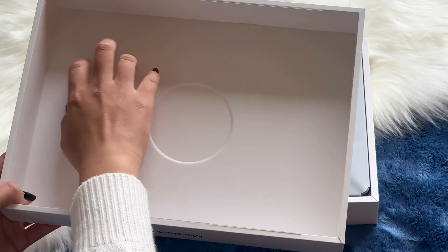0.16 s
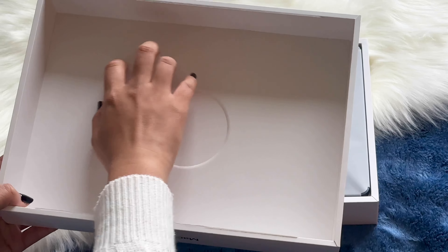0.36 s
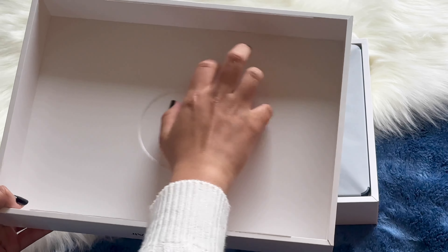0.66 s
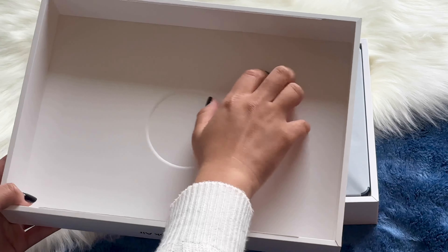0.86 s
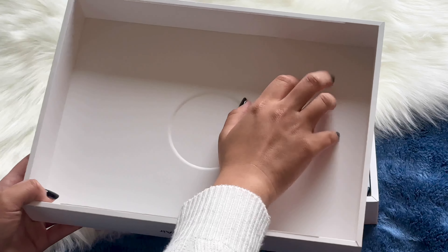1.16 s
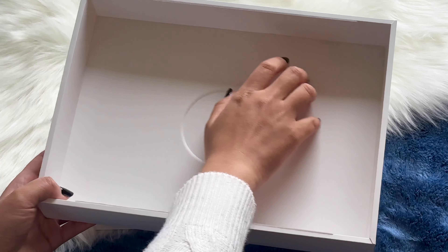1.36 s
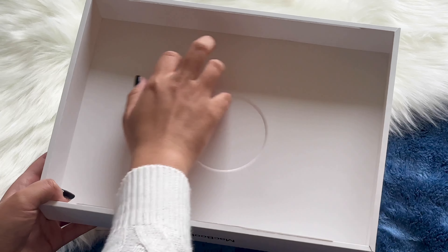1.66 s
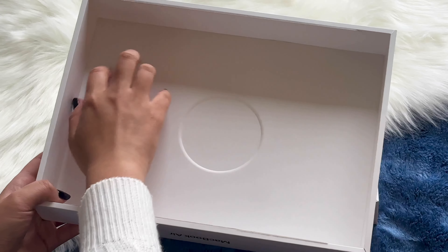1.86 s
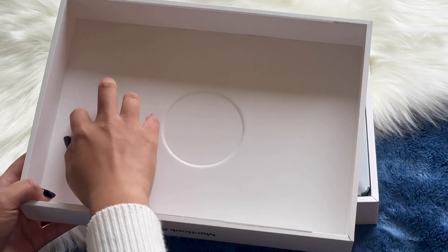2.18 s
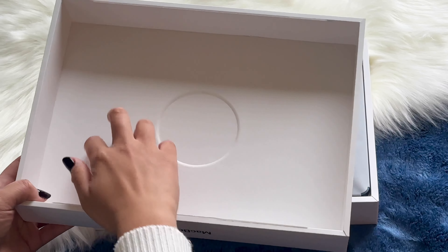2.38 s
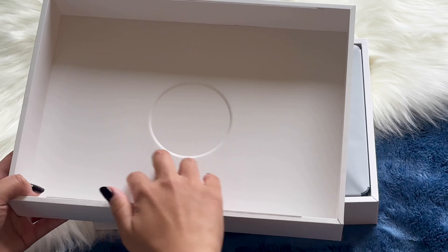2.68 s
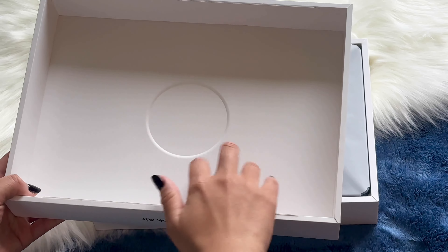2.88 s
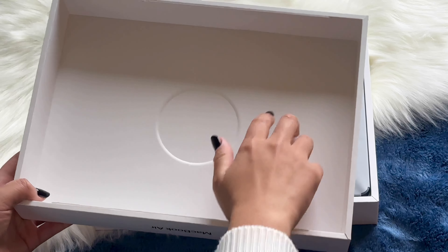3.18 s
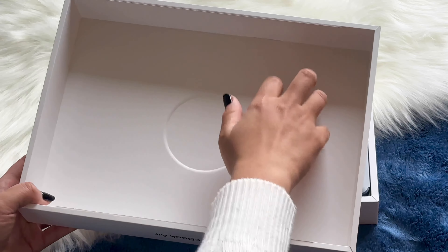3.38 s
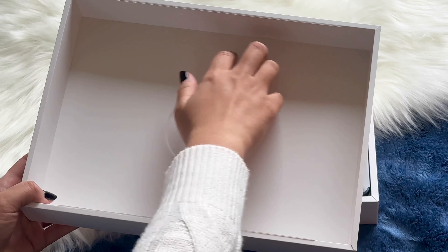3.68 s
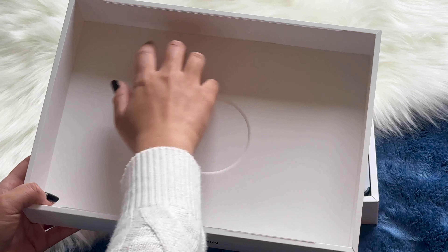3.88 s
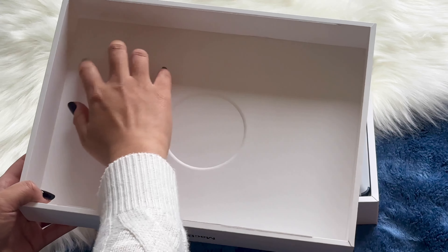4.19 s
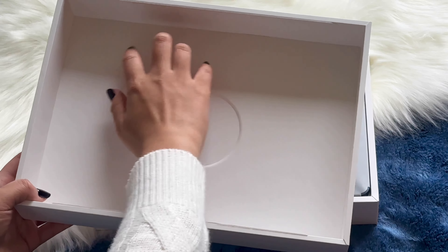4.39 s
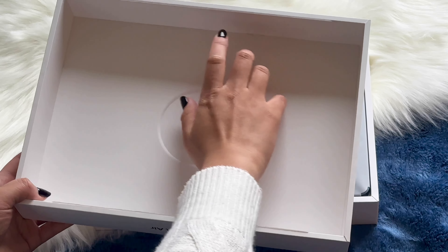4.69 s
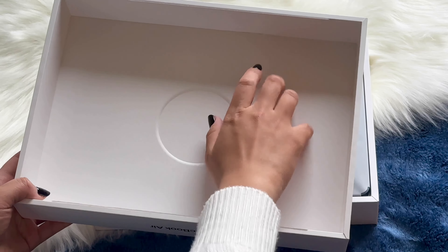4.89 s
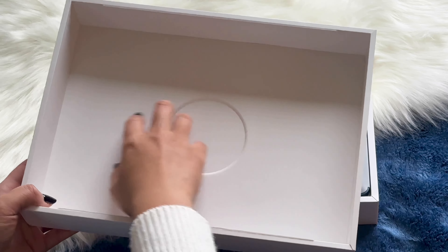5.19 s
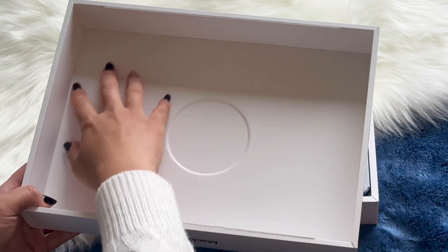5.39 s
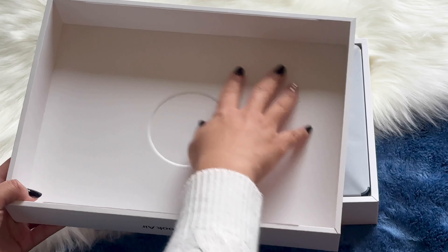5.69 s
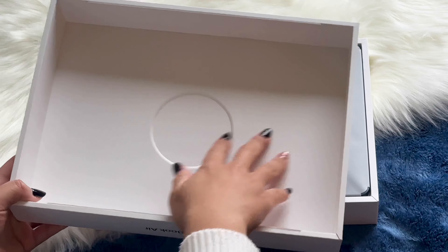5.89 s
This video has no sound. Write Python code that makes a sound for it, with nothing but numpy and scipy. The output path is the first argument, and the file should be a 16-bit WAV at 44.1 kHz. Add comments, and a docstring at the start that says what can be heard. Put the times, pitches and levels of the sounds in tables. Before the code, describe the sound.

Long fingernails tap and scratch rapidly inside a hollow stiff cardboard lid, very close, ending with flat fingers sweeping softly across the card.

```python
"""In a small, well-damped room, long fingernails tap and scratch inside a stiff cardboard lid, very close.
Each tap superposes a tick, a clack and decaying modes of panel, wall and lid on a low drum note.
Each drag is a train of random slips over the paper grain, filtered by the card, until the nail lifts off.
At the end flat fingers sweep the lid: much denser slips hiss softly, and finger pads bump it almost tickless.
A cuff rustles throughout, and the air space of the lid hums on after each excitation."""
import sys
import numpy as np
from scipy import signal
from scipy.fft import rfft, irfft
from scipy.io import wavfile
from scipy.ndimage import uniform_filter1d, minimum_filter1d

SR = 44100
rng = np.random.default_rng(int(sys.argv[2]) if len(sys.argv) > 2 else 0)


def generate_wav(signal):
    """Clip the signal to [-1, 1] and save it as 16-bit WAV at the path in sys.argv[1]."""
    frames = np.transpose(np.atleast_2d(signal))
    scaled = np.clip(frames, -1, 1) * 32767
    pcm = np.round(scaled).astype(np.int16)
    wavfile.write(sys.argv[1], SR, pcm)


N = 266784
TIME = np.arange(N) / SR


def undb(db):
    """Level to amplitude: 20 dB per factor of ten."""
    return 10 ** (np.asarray(db) / 20)


def unit(x):
    """Energy normalisation: scale to a mean energy of one per channel."""
    return x / np.sqrt(np.sum(x ** 2) / len(np.atleast_2d(x)) + 1e-18)


def fade(t, t60):
    """Exponential damping: 60 dB down after t60."""
    return np.exp(-np.log(1000) * t / t60)


def along(curve, t):
    """Linear interpolation: value of a curve at a time."""
    return np.interp(t, *np.transpose(curve))


def add(out, start, x):
    """Superposition: mix x into out from a start time."""
    i = max(int(start * SR), 0)
    out[:, i:i + x.shape[1]] += x[:, :N - i]


def through(x, response):
    """Convolution: pass a sound through the impulse response of a linear system."""
    filtered = signal.fftconvolve(np.atleast_2d(x), np.atleast_2d(response), axes=1)
    return filtered[:, :x.shape[-1]]


def highpass(x, hz, order):
    """Butterworth high-pass: attenuate what lies below a frequency."""
    return signal.sosfilt(signal.butter(order, hz, "high", fs=SR, output="sos"), x)


def lowpass(x, hz, order):
    """Butterworth low-pass: attenuate what lies above a frequency."""
    return signal.sosfilt(signal.butter(order, hz, "low", fs=SR, output="sos"), x)


def resonance(x, hz, q):
    """Simple resonator: band-pass with gain one at its centre."""
    return signal.lfilter(*signal.iirpeak(hz, q, fs=SR), x)


def colour(points, scale=1, size=4096):
    """Minimum phase: the folded cepstrum gives a causal response with the given spectrum."""
    hz, db = np.transpose(points)
    f = np.maximum(np.fft.rfftfreq(size, 1 / SR), 1)
    gain_db = np.interp(np.log(f), np.log(hz * scale), db)
    cepstrum = irfft(np.log(undb(gain_db)))
    cepstrum[1:size // 2] *= 2
    cepstrum[size // 2 + 1:] = 0
    return unit(irfft(np.exp(rfft(cepstrum)))[:size // 2])


def stereo_noise(count, apart):
    """Partial coherence: noise in two channels with a shared and an opposed part."""
    mid, side = rng.standard_normal((2, count))
    return (mid + apart * np.array([side, -side])) / np.hypot(1, apart)


def scatter(t60, tail_db, apart):
    """Diffuse reflection: a direct pulse, then a dense decaying pattern that is new on each call."""
    t = np.arange(int(t60 * SR) + 2) / SR
    response = undb(tail_db) * unit(stereo_noise(len(t), apart) * fade(t, t60))
    response[:, 0] += 1
    return unit(response)


def grains(count, per_s, spread_db):
    """Stick-slip friction: tiny slips over paper fibres, random in time, sign and size."""
    slips = (rng.random(count) < per_s / SR) * rng.choice([-1, 1], count)
    size_db = spread_db * np.clip(rng.standard_normal(count), -2, 2)
    return unit(slips * undb(size_db)) * np.sqrt(count)


def walk(count, rate):
    """Random fluctuation: normal values, rate per second, joined by straight lines."""
    steps = np.arange(count) / SR * rate
    knots = np.arange(int(steps[-1]) + 2)
    return np.interp(steps, knots, rng.standard_normal(len(knots)))


# the hand wanders to and fro across the lid: (t/s, place from about -1 at the left wall to 1 at the right)
HAND = [(0, -0.94), (.5, -0.017), (1, 1), (1.35, 0.63), (1.75, 0.023), (2.05, -0.77), (2.75, -0.55),
        (3.3, 0.95), (3.55, 1), (4.15, -1.06), (4.5, 0.049), (4.95, 0.78), (5.3, -0.6), (5.8, 0.58),
        (6.05, -0.052)]


def place(t):
    """Source motion: where the hand is across the lid."""
    return along(HAND, t)


def pan(db):
    """Level difference between channels: left and right gains of constant mean energy."""
    gains = undb(np.array([[.5], [-.5]]) * db)
    return gains / np.sqrt(np.mean(gains ** 2, axis=0))


# left minus right: added with the hand at the left wall; default at the centre; for card and drum at the centre
PAN_DB, LEFT_DB, CARD_LEFT_DB, DRUM_LEFT_DB = 5, 1.8, -0.64, 2.5


def from_hand(t, follow=1, left_db=LEFT_DB):
    """Localisation by level: gains of a sound that follows the hand more or less closely."""
    return pan(left_db - follow * PAN_DB * place(t))


# spectrum of the rustling cuff: (f/Hz, level/dB)
SLEEVE_SPECTRUM = [(30, -18), (70, -10), (145, -7), (250, 1.5), (700, -3), (1500, -10), (3000, -17),
                   (5000, -22.5), (8000, -27.5), (12000, -49), (15000, -71)]


def sleeve(level_db=-53, swell_db=2):
    """Broadband friction noise: the knitted cuff and the holding hand rustle faintly all the time."""
    level = undb(level_db + swell_db * walk(N, rate=4.9))
    return level * through(stereo_noise(N, apart=0.76), colour(SLEEVE_SPECTRUM))


# panel modes above the drum note, before chance: (f/Hz, t60/s, level/dB)
PANEL_MODES = [(202, 0.081, 0), (234, 0.052, 2.5), (291.6, 0.032, 9.5), (309, 0.091, -13), (331, 0.1, 3),
               (429, 0.028, 8.5), (460, 0.059, -3), (500, 0.057, 2), (560, 0.037, -9.5), (626, 0.069, -1.5),
               (646, 0.094, -6), (760, 0.044, -22)]


def panel(t, knock_hz, reach=0.39, far_db=-13, lag=0.75):
    """Modal superposition: the struck spot favours panel modes around one frequency."""
    hz, t60, db = np.transpose(PANEL_MODES)[:, :, None]
    octaves = np.log2(hz / knock_hz)
    favour_db = far_db * (1 - np.exp(-(octaves / reach) ** 2))
    hz = hz * (1 + 0.018 * rng.standard_normal(hz.shape))  # the grip bends the lid a little
    gain_chance, phase_chance = rng.standard_normal((2, 2, len(PANEL_MODES), 1))
    size = undb(db + favour_db + 3 * gain_chance)
    rings = size * fade(t, t60) * np.sin(2 * np.pi * hz * t + lag * phase_chance)
    return unit(rings.sum(axis=1))


# modes of the stiff front wall: (f/Hz, t60/s, level/dB)
WALL_MODES = [(360, 0.14, -1), (550.5, 0.092, 2.5), (639, 0.12, 3)]
# how strongly the hand rings that wall, most when it is drawn back to it: (t/s, level/dB)
WALL_RING = [(0, -11.5), (2.4, -15.5), (2.55, 3.5), (2.75, 0.5), (2.9, 0), (3.12, 5.5), (3.2, -16.5),
             (6.05, -7.5)]


def wall(t, when):
    """Modal coupling: front wall modes, excited as strongly as the hand's moment allows."""
    hz, t60, db = np.transpose(WALL_MODES)[:, :, None]
    phase = .5 * rng.standard_normal((2, len(WALL_MODES), 1))  # its own in each channel
    rings = undb(db) * fade(t, t60) * np.sin(2 * np.pi * hz * t + phase)
    return undb(along(WALL_RING, when)) * unit(rings.sum(axis=1))


# mean drum note at the centre of the lid, how much lower it is at a wall, and its spread with the grip
DRUM_HZ, DRUM_SAG_HZ, DRUM_SPREAD_HZ = 160.5, 10.6, 5.2


def drum_note(t, start, lag, t60=0.078):
    """Fundamental mode: a damped sine whose pitch depends on place and grip."""
    hz = DRUM_HZ - DRUM_SAG_HZ * place(start) ** 2 + DRUM_SPREAD_HZ * rng.standard_normal()
    envelope = fade(t, t60) * (1 - fade(t, 0.067))
    return pan(DRUM_LEFT_DB) * unit(np.sin(2 * np.pi * hz * t + lag) * envelope)


def lid_sway(t, start, lag, hz=74, t60=0.079, level_db=-44, wall_db=39, right_db=-8):
    """Rigid-body motion: blows near a wall rock the whole lid, most on the hand-held left side."""
    envelope = fade(t, t60) * (1 - fade(t, 0.15))
    level = level_db + wall_db * place(start) ** 2 + right_db * max(place(start), 0)
    return undb(level) * unit(np.sin(2 * np.pi * hz * t + lag) * envelope)


# spectrum of the card's clack, before its pitch shift: (f/Hz, level/dB)
CLACK_SPECTRUM = [(60, -51), (200, -36.5), (550, 0.5), (850, 6), (1300, 2), (1800, 1), (2400, -17.5),
                  (3200, -14.5), (7000, -43.5), (14000, -102)]


def card_clack(t, variety=0.072, dent_db=-3, dent_s=.0012):
    """Impact response: a coloured, scattered pulse and the dent of the card snapping inward."""
    pitch = np.exp(variety * rng.uniform(-1.6, 1))  # each spot of the card has its own stiffness
    pulse = through(1. * (t == 0), colour(CLACK_SPECTRUM, pitch))
    card = unit(through(pulse, scatter(t60=0.02, tail_db=9.0, apart=0.57)))
    ramp = np.maximum(1 - t / dent_s, 0)
    dent = unit(lowpass(highpass(ramp, hz=300, order=3), hz=1680, order=3))
    return card + undb(dent_db) * dent


# spectrum of the tick, before its pitch shift: (f/Hz, level/dB)
TICK_SPECTRUM = [(500, 2.5), (1800, 1), (2900, -3.5), (3800, 0.5), (4600, 3.5), (5300, -0.5), (6300, -4.5),
                 (7500, -20), (10000, -31), (12000, -54), (16000, -66)]
# hiss and tick shift as the fingers change their angle: (t/s, centre f/Hz)
HISS_CENTRE = [(0, 4460), (.45, 4200), (.7, 4930), (1.1, 5000), (1.33, 4850), (1.52, 5240), (1.58, 4440),
               (1.68, 4650), (1.76, 4320), (1.9, 4850), (2.2, 4760), (2.35, 5460), (2.46, 4460),
               (2.6, 4700), (2.64, 4080), (3.05, 3940), (3.3, 4720), (3.55, 5240), (3.68, 4250),
               (3.79, 4860), (3.89, 4450), (3.95, 5100), (4.03, 4670), (4.6, 4700), (4.97, 4870),
               (5.13, 4200)]


def tip_tick(t, start, centre_hz=4600):
    """Hard contact: a short bright pulse, shifted in pitch by the angle of the finger."""
    pulse = through(1. * (t == 0), colour(TICK_SPECTRUM, along(HISS_CENTRE, start) / centre_hz))
    return unit(through(pulse, scatter(t60=0.011, tail_db=-3.5, apart=0.78)))


# the clack lies between knock and tick, louder on stiff, high spots
CLACK_DB, CLACK_TICK_SHARE, CLACK_DB_PER_OCTAVE = -6.5, 0.7, 3
# nail taps, and at the end soft bumps of the finger pads, with almost no tick; levels before offsets:
# (t/s, knock level/dB, knock f/Hz, drum level/dB, tick level/dB)
TAPS = [(0.0092, -13.5, 210, -26.5, -27.5), (0.1006, -17.5, 510, -49, -25.5), (0.195, -14, 188, -18, -30),
        (0.2367, -12.5, 198, -20, -25), (0.298, -13.5, 220, -33, -29), (0.4213, -13.5, 202, -20.5, -25),
        (0.4605, -13.5, 200, -25, -34), (0.5308, -13.5, 277, -24, -32), (0.67, -14, 234, -23.5, -28.5),
        (0.748, -13.5, 234, -24.5, -30.5), (0.791, -16.5, 220, -27, -31.5), (0.883, -16.5, 326, -25, -31.5),
        (1.025, -17, 240, -38, -29.5), (1.0946, -18, 191, -28, -31), (1.1529, -21.5, 212, -27.5, -41.5),
        (1.259, -20.5, 710, -43, -30.5), (1.2986, -15, 234, -26.5, -29), (1.3844, -14, 228, -20.5, -30),
        (1.543, -11, 680, -40, -28), (1.7489, -11, 322, -13, -22), (1.7878, -12.5, 234, -21, -24),
        (1.8687, -17, 514, -43, -23.5), (2.0191, -15, 184, -16, -34.5), (2.0348, -14, 455, -31, -20),
        (2.2595, -24, 195, -29.5, -47), (2.2814, -22.5, 726, -35, -34.5), (2.4659, -16, 190, -14.5, -29.5),
        (2.4825, -17, 330, -19, -32.5), (2.5243, -20, 211, -30, -29.5), (2.7095, -22.5, 344, -21.5, -30),
        (2.751, -19, 360, -36, -21.5), (2.9067, -18.5, 225, -29, -27.5), (2.947, -14, 219, -17, -27),
        (3.0388, -17.5, 540, -19, -34.5), (3.0853, -20.5, 610, -48, -34), (3.1219, -17.5, 210, -19, -28.5),
        (3.2264, -13, 218, -15.5, -32.5), (3.303, -17.5, 202, -19, -32.5), (3.311, -21, 330, -19, -39),
        (3.3319, -17, 316, -42, -42), (3.429, -15, 483, -29, -27), (3.445, -15, 231, -45, -32.5),
        (3.5474, -13, 236, -29, -27.5), (3.6796, -15, 705, -23.5, -30.5), (3.8566, -12.5, 700, -45, -24),
        (3.943, -13, 446, -37, -20), (4.0245, -11.5, 220, -24, -30), (4.033, -15.5, 263, -28, -26),
        (4.108, -21.5, 209, -35, -34.5), (4.1932, -20.5, 480, -21, -29.5), (4.2564, -19.5, 200, -38, -37.5),
        (4.266, -19, 200, -34, -36), (4.282, -27, 420, -38, -35), (4.4664, -13.5, 392, -19.5, -28),
        (4.5282, -13.5, 333, -24, -23), (4.6372, -11, 235, -16.5, -28.5), (4.6489, -24, 324, -31, -29.5),
        (4.812, -12.5, 318, -24, -29), (4.853, -22.5, 300, -34, -50), (4.926, -14.5, 236, -24.5, -29.5),
        (5.0402, -11, 283, -26, -32), (5.162, -11.5, 283, -21, -31), (5.199, -8.5, 196, -17, -29),
        (5.2442, -21.5, 342, -30, -37), (5.649, -22, 190, -21.5, -54), (5.741, -30.5, 230, -42, -54),
        (5.828, -31, 200, -31, -54), (5.932, -39, 200, -40, -54), (5.975, -30.5, 220, -29, -56)]


def taps(drum_db=0, knock_db=0, tick_db=-0.5, radiate_hz=118, push_s=0.0011, wall_db=-1):
    """Impulsive excitation: a landing nail or soft finger pad excites tick, clack, panel, drum, lid, wall."""
    out, t = np.zeros((2, N)), np.arange(SR // 4) / SR
    push = np.sin(np.pi / 2 * np.minimum(t / push_s, 1)) ** 2  # the fingertip loads the panel gently
    blow = np.sqrt(SR / 100)  # levels are energies spread over 10 ms
    for start, knock, knock_hz, drum, tick in TAPS:
        lag = 0.65 * rng.standard_normal((2, 1))
        height_db = CLACK_DB_PER_OCTAVE * np.log2(knock_hz / PANEL_MODES[0][0])
        clack = CLACK_DB + knock + CLACK_TICK_SHARE * (tick - knock) + height_db
        on_card = from_hand(start, follow=0.36, left_db=CARD_LEFT_DB)
        low = undb(drum + drum_db) * drum_note(t, start, lag)
        upper = undb(knock + knock_db) * on_card * panel(t, knock_hz)
        # air slips round the open lid, so it radiates little below its drum note
        body = highpass(push * (low + upper), radiate_hz, order=6)
        body = body + undb(drum) * lid_sway(t, start, lag)
        body = body + undb(clack + wall_db) * wall(t, start)
        contact = undb(clack) * on_card * card_clack(t)
        contact = contact + undb(tick + tick_db) * from_hand(start, follow=0.96) * tip_tick(t, start)
        # the panel first gives way, so the sound opens with a dip in pressure
        add(out, start, blow * (body - contact))
    return out


# a dragged spot gives little outside these multiples of its hollow resonance
BASS_CUT_SHARE, TREBLE_CUT_RATIO = 0.3, 2.77
# spectrum of the grinding card: (f/Hz, level/dB)
GRIND_SPECTRUM = [(50, -33), (105, -27), (145, 9.5), (200, -5), (330, 6.5), (430, -3), (660, -0.5),
                  (950, -1.5), (1400, -3.5), (1900, -11), (2700, -33.5), (3600, -17), (7000, -94),
                  (14000, -92)]


def card_grind(slips, hollow_hz, middle, hollow_db=-3, ring_db=-9, wall_db=-3):
    """Source-filter principle: slips excite the spot under the nail, the panel and the wall."""
    card = through(scatter(t60=0.017, tail_db=1.0, apart=0.62), colour(GRIND_SPECTRUM))
    card = highpass(card, BASS_CUT_SHARE * hollow_hz, order=1)
    card = lowpass(card, TREBLE_CUT_RATIO * hollow_hz, order=2)
    card = unit(card + undb(hollow_db) * resonance(card, hollow_hz, q=3.4))  # the spot rings most
    ring_s = np.arange(card.shape[1]) / SR
    modes = highpass(panel(ring_s, hollow_hz) * (1 - fade(ring_s, 0.0031)), hz=330, order=2)
    card = unit(card + undb(ring_db) * modes)  # the slips keep the panel modes ringing too
    t = np.arange(len(slips)) / SR
    return through(slips, card) + undb(wall_db) * through(slips, wall(t, middle))


# hiss of a sliding nail: (multiple of the hiss centre f/Hz, level/dB)
HISS_SPECTRUM = [(.25, -24), (.42, -3), (.6, -8), (.72, -6), (.86, -4), (1, 3), (1.12, -1), (1.3, -6.5),
                 (1.55, -14), (2.1, -33), (3, -79)]


def tip_hiss(slips, progress, start, end, catch_db=1.95):
    """Moving formant: the tip turns as it slides, so its hiss glides; it catches and eases."""
    middle = (start + end) / 2
    echoes = scatter(t60=.02, tail_db=-4, apart=.45)
    early_hz = along(HISS_CENTRE, (start + middle) / 2)
    late_hz = along(HISS_CENTRE, (middle + end) / 2)
    early = unit(through(echoes, colour(HISS_SPECTRUM, early_hz)))
    late = unit(through(echoes, colour(HISS_SPECTRUM, late_hz)))
    scrape = slips * undb(catch_db * walk(len(slips), rate=39.4))
    return through(scrape * (1 - progress), early) + through(scrape * progress, late)


# spectrum of the finest fibres, under nails and flat fingers: (f/Hz, level/dB)
FIZZ_SPECTRUM = [(4000, -30), (6500, 1), (8000, 2), (10000, -1), (11500, -10.5), (13500, -22), (15500, -36)]


def fibre_fizz(slips):
    """High-frequency scattering: the slips excite the finest fibres."""
    fibres = through(scatter(t60=0.017, tail_db=18.0, apart=1), colour(FIZZ_SPECTRUM))
    return through(slips, unit(fibres))


def edge_rasp(force, centre_hz=2150, level_db=-12, hard_db=-24):
    """Non-linear friction: pressed hard, the nail edge digs in and rasps with sparse, uneven slips."""
    bite = np.minimum(force / undb(hard_db), 1)
    edge = scatter(t60=0.018, tail_db=-1.5, apart=0.55)
    for _ in range(3):
        edge = resonance(edge, centre_hz, q=1.1)
    slips = bite * force * grains(len(force), per_s=1000, spread_db=9)
    return undb(level_db) * through(slips, unit(edge))


# nail drags, levels before offsets: (start t/s, end t/s, level/dB, swell from start to end/dB,
# hollow resonance f/Hz, hiss re level/dB, fizz re level/dB)
DRAGS = [(0.023, 0.115, -46, 0, 420, -15, -41), (0.107, 0.309, -43, 5, 450, -7, -22),
         (0.304, 0.404, -37.5, 11, 770, -8.5, -32), (0.432, 0.525, -40.5, 16, 420, -12, -42),
         (0.514, 0.585, -34.5, -4, 750, -15, -44), (0.573, 0.647, -28.5, 4, 607, -14, -49),
         (0.677, 0.741, -37.5, -4, 694, -14, -32), (0.759, 0.83, -35.5, -16, 430, -15, -38),
         (0.926, 1.007, -39, -21.5, 676, -10, -45), (1.029, 1.105, -40.5, -10, 760, -13.5, -42),
         (1.112, 1.195, -37, 8, 414, -16, -35), (1.207, 1.3, -42, 8, 590, -5, -16),
         (1.306, 1.377, -32, 2, 690, -9, -36), (1.404, 1.497, -29.5, 11, 660, -7.5, -38),
         (1.499, 1.579, -26.5, 1, 680, -4, -37), (1.579, 1.636, -28.5, 0, 880, -8, -33),
         (1.624, 1.676, -25.5, 0.5, 870, -6, -42), (1.753, 1.817, -26.5, -3, 363, -12, -39),
         (1.878, 1.936, -39, -3, 624, -7.5, -43), (2.051, 2.175, -38.5, -5.5, 1950, -4.5, -18),
         (2.173, 2.203, -31.5, 2.5, 1100, -11, -25), (2.208, 2.276, -47, 7, 680, -5, -7.5),
         (2.273, 2.364, -29.5, 6, 1250, -4.5, -17), (2.467, 2.535, -36.5, -17, 424, -13, -27),
         (2.531, 2.617, -33, 1.5, 510, -6.5, -16.5), (2.623, 2.72, -30.5, 0, 470, -10, -34),
         (2.761, 2.815, -31.5, 11, 675, -6.5, -48), (2.907, 2.983, -39.5, 6, 530, -11.5, -42),
         (3.039, 3.048, -23, 0, 570, -7.5, -32), (3.0848, 3.087, -22.5, 3, 1000, -3, -30),
         (3.119, 3.157, -36, -18, 480, -12, -12), (3.213, 3.274, -36, 20.5, 690, -13, -35),
         (3.308, 3.356, -41.5, 30.5, 720, -13.5, -42), (3.439, 3.49, -36, 16.5, 755, -15, -41),
         (3.497, 3.644, -33.5, -1, 436, -16.5, -35), (3.688, 3.758, -24, 3.5, 710, -10.5, -31),
         (3.751, 3.811, -25, 6.5, 970, -4.5, -31), (3.814, 3.895, -24, 0, 716, -11.5, -37),
         (3.949, 4.003, -26, 2, 900, -8, -44), (4.026, 4.082, -29, -0.5, 840, -13, -36),
         (4.086, 4.243, -56.5, -32, 600, -5, -24), (4.251, 4.331, -31.5, -3, 610, -12, -30),
         (4.477, 4.503, -32.5, 2, 700, -12, -34), (4.537, 4.552, -28, 1, 420, -17, -39),
         (4.644, 4.736, -38, -15, 423, -8.5, -24), (4.794, 4.825, -25.5, -6, 960, -16.5, -30),
         (4.822, 4.959, -30.5, 12.5, 850, -10.5, -32), (4.959, 5.032, -25, 5, 730, -12.5, -45),
         (5.031, 5.091, -24.5, -1, 640, -3.5, -25), (5.097, 5.154, -24.5, 4.5, 680, -1, -23),
         (5.157, 5.199, -28, -10, 890, -5.5, -20), (5.568, 5.723, -42, 2, 577, -15, -35),
         (5.742, 5.774, -32.5, -5, 600, -18, -35), (5.819, 5.915, -38.5, 10, 343, -10, -3)]


def drags(grind_db=1.0, hiss_db=-0.5, fizz_db=0, land_s=0.0043, lift_s=0.0084, flutter_db=0.64, swell_db=1):
    """Sliding friction: a nail's slips shake the card and hiss at the tip, and stop as it lifts off."""
    out = np.zeros((2, N))
    for start, end, level, swell, hollow_hz, hiss, fizz in DRAGS:
        middle = (start + end) / 2
        length = max(end - start, land_s)
        t = np.arange(int((length + 0.12) * SR)) / SR
        progress = np.minimum(t / length, 1)
        # a short skid lands and lifts faster than a long drag
        landing = np.clip(t / min(land_s, length / 2), 0, 1)
        lifting = np.clip((length - t) / min(lift_s, length / 2) + 1, 0, 1)
        chance_db = flutter_db * walk(len(t), rate=146.0) + swell_db * walk(len(t), rate=28.4)
        force = landing * lifting * undb(level + swell * (progress - .5) + chance_db)
        slips = force * grains(len(t), per_s=3600, spread_db=5)
        grind = undb(grind_db) * card_grind(slips, hollow_hz, middle)
        bright = undb(hiss + hiss_db) * tip_hiss(slips, progress, start, end)
        bright = bright + edge_rasp(force) + undb(fizz + fizz_db) * fibre_fizz(slips)
        on_card = from_hand(middle, follow=0.49, left_db=CARD_LEFT_DB)
        add(out, start, on_card * grind + from_hand(middle, follow=1.15) * bright)
    return out


SWEEP_START_S = 5.21  # the fingers are flat on the lid
SWEEP_TURN_S, RETURN_PITCH = 5.8, 0.82  # the hand turns back, and its hiss drops by this factor
# spectra of skin hiss, rubbed card and drumming pads: (f/Hz, level/dB)
SWISH_SPECTRUM = [(900, -43), (1900, -3), (3000, -5.5), (4200, 1.5), (5200, 6.5), (6300, 1.5), (7500, -7),
                  (9500, -18), (13000, -66)]
RUB_SPECTRUM = [(100, -32), (280, -8.5), (450, -6.5), (620, -1.5), (850, -7.5), (1200, -1.5), (2000, -3.5),
                (3000, -19), (6000, -59)]
DRUMMING_SPECTRUM = [(40, -36), (100, -28), (146, 2), (200, -1.5), (330, -13), (700, -37), (3000, -83)]
# flat fingers sweeping the lid: (t/s, hiss level/dB before offsets)
SWEEP = [(5.26, -42.5), (5.382, -43.5), (5.546, -31.5), (5.744, -30.5), (5.816, -37.5), (5.943, -30.5),
         (6.04, -29.5)]


def sweep(hiss_db=1.5, rub_db=-7.0, fizz_db=-16, drumming_db=-17, judder_db=3, return_rub_db=2, flutter_db=1):
    """Distributed friction: flat fingers touch many fibres at once, so the slips are fine and even."""
    hiss = along(SWEEP, TIME)
    contact = np.clip((TIME - SWEEP_START_S) / 0.075 + 1, 0, 1)
    force = contact * undb(hiss + flutter_db * walk(N, rate=97))
    slips = force * grains(N, per_s=9000, spread_db=1.5)
    returning = np.clip((TIME - SWEEP_TURN_S) / 0.25, 0, 1)
    outward = through(slips * np.sqrt(1 - returning), colour(SWISH_SPECTRUM))
    back = through(slips * np.sqrt(returning), colour(SWISH_SPECTRUM, RETURN_PITCH))
    skin = through(outward + back, scatter(t60=.03, tail_db=-8, apart=1.5))
    card = through(slips * undb(return_rub_db * returning), colour(RUB_SPECTRUM))
    card = through(card, scatter(t60=0.024, tail_db=-5.0, apart=0.76))
    # the soft pads drum the panel, harder on the way back
    pad_push = contact * undb(hiss + judder_db * returning)
    pads = through(pad_push * stereo_noise(N, apart=0.4), colour(DRUMMING_SPECTRUM))
    # the finest fibres fizz separately under each finger
    fibres = through(contact * undb(hiss) * stereo_noise(N, apart=0.63), colour(FIZZ_SPECTRUM))
    high = undb(hiss_db) * skin + undb(fizz_db) * fibres
    low = undb(rub_db) * card + undb(drumming_db) * pads
    return from_hand(TIME) * (high + low)


def air_space(lid, cavity_hz=144, cavity_db=-5):
    """Cavity resonance: the air space of the lid hums on after each blow."""
    return lid + undb(cavity_db) * resonance(lid, cavity_hz, q=17.3)


def small_room(x):
    """Reverberation: the direct sound, then a short, soft diffuse tail."""
    return through(x, scatter(t60=.22, tail_db=-16.0, apart=0.42))


def scene():
    """Superposition: all sources share the lid's air space and the room."""
    lid = sleeve() + taps() + drags() + sweep()
    return small_room(air_space(lid))


def record(dry, ceiling=0.47, low_hz=48, top_hz=15000):
    """Band and peak limiting: thin the deep bass, limit the highest peaks and cut the top."""
    thin = highpass(dry, low_hz, order=2)
    room_left = np.minimum(1, ceiling / (np.abs(thin).max(axis=0) + 1e-9))
    gain = uniform_filter1d(minimum_filter1d(room_left, size=129), size=129)
    top_cut = signal.ellip(8, .2, 70, top_hz, fs=SR, output="sos")
    return signal.sosfilt(top_cut, thin * gain)


dry = scene()
out = record(dry)
generate_wav(out)
```